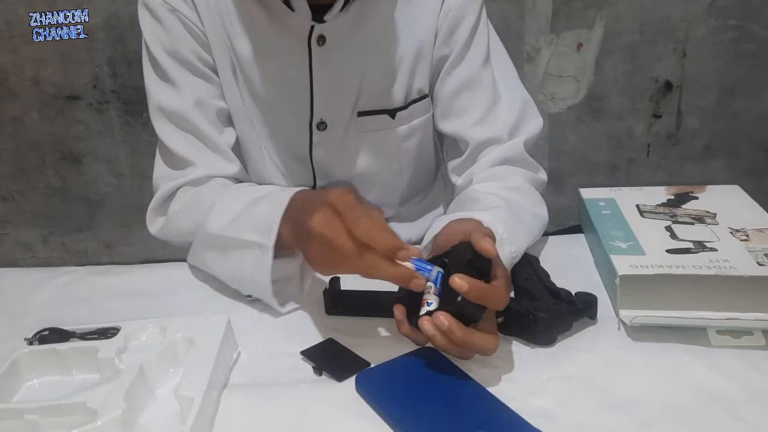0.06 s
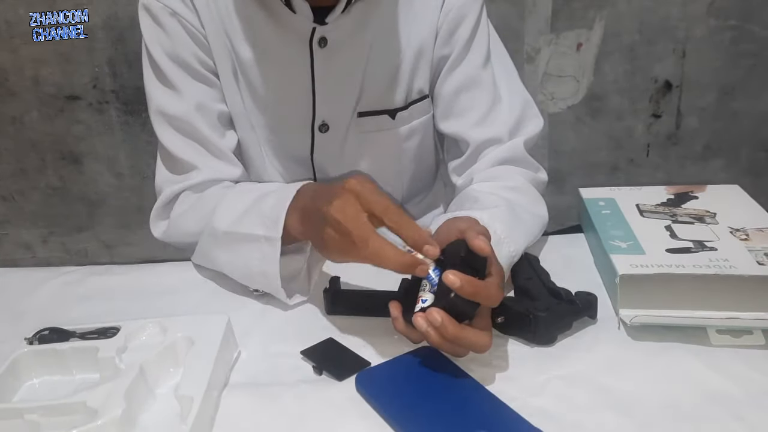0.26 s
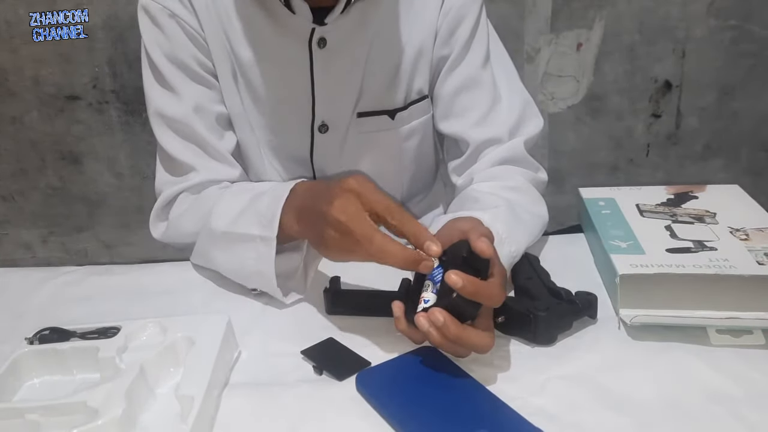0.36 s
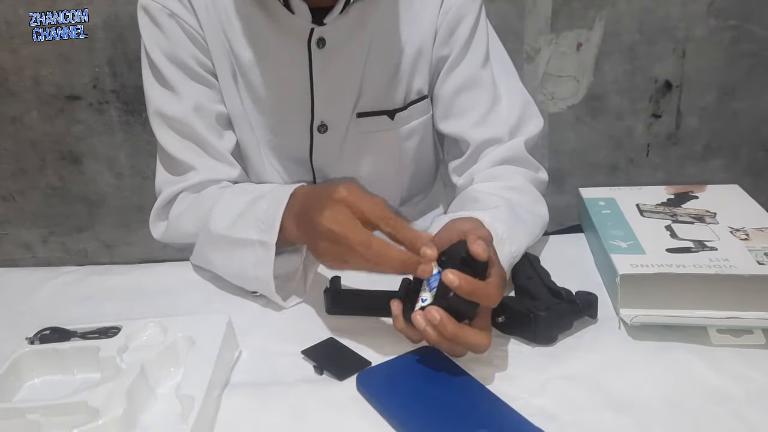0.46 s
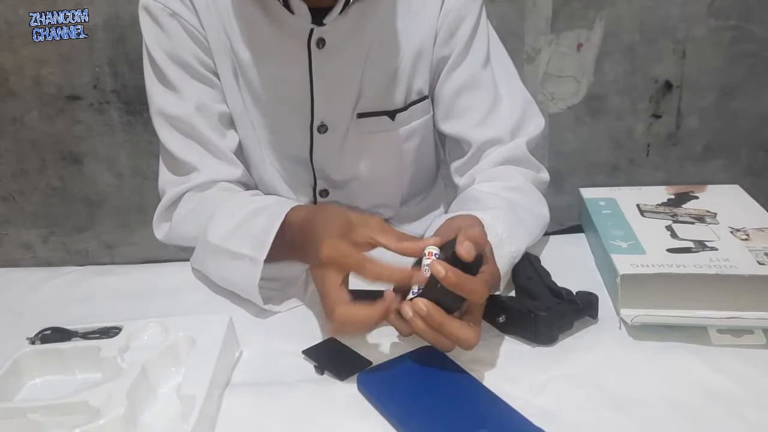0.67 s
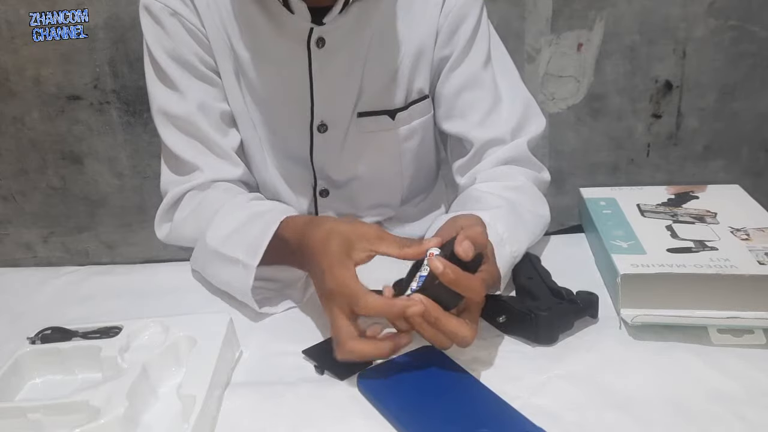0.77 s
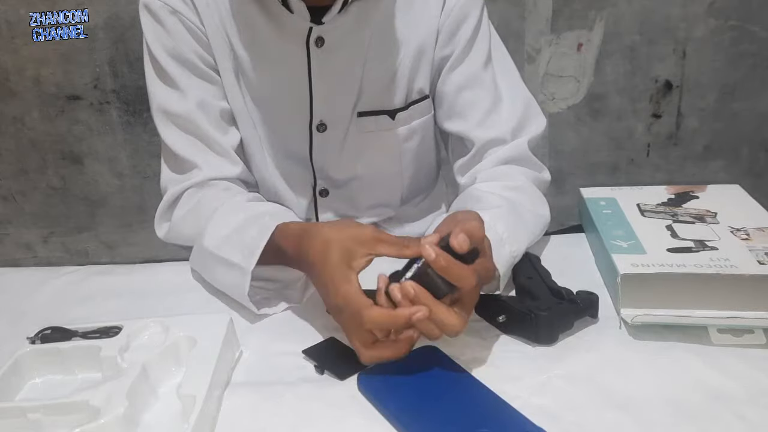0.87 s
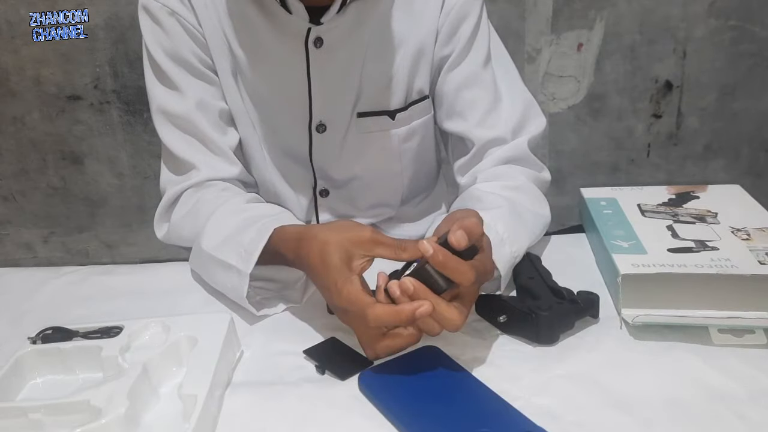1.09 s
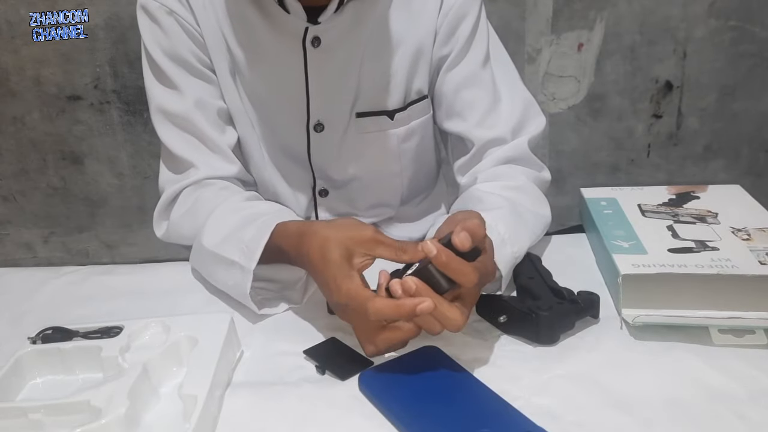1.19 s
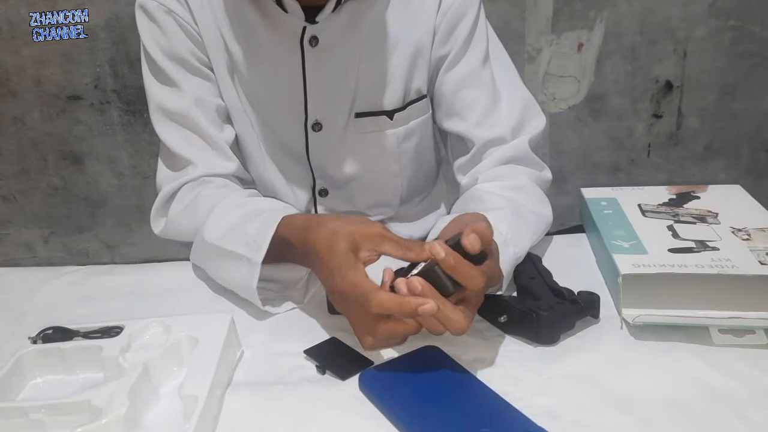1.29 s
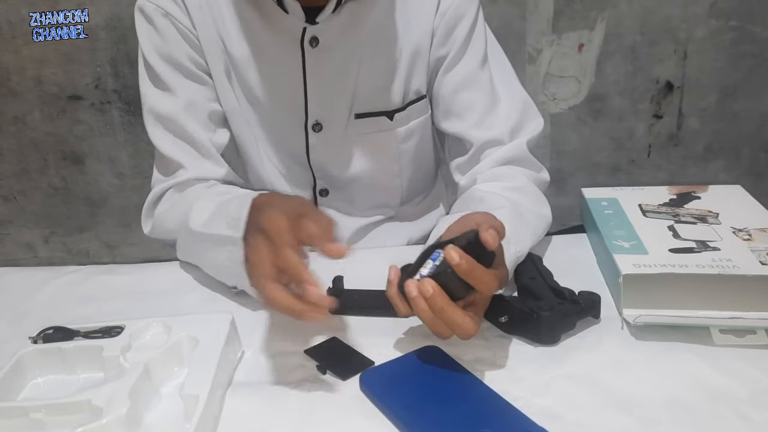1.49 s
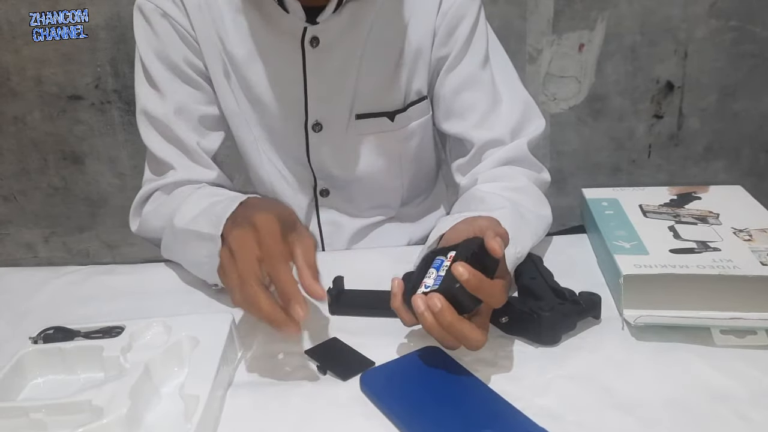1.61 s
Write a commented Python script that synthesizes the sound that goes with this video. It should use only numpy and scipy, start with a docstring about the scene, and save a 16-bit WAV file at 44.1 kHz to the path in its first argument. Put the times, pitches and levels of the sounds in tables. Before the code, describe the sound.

Sharp plastic clicks of a battery being fitted into a small light, over faint crickets.

```python
"""A bare, ringing room, with a cricket and an insect chorus singing outside.
A low room ring dies away into faint rustle; a battery is pushed into a small light's plastic compartment.
It knocks against the housing, scrapes past the spring contact in tiny slips and snaps home.
Nearly all of the sound is in the right channel; the left carries little but hiss."""
import sys
import numpy as np
from scipy import signal
from scipy.fft import rfft, irfft
from scipy.io import wavfile
from scipy.ndimage import uniform_filter1d

SR = 44100
rng = np.random.default_rng(int(sys.argv[2]) if len(sys.argv) > 2 else 0)


def output_pcm(signal):
    """Save a mono or channel-first signal as 16-bit PCM at the path in sys.argv[1].

    Samples are clipped to [-1, 1] before scaling.
    """
    pcm = np.clip(np.atleast_2d(signal).T, -1, 1) * 32767
    wavfile.write(sys.argv[1], SR, np.round(pcm).astype(np.int16))


N = 72765
T = np.arange(N) / SR
RING_T = np.arange(int(.6 * SR)) / SR


def amp(db):
    """Decibels to gain."""
    return 10 ** (np.asarray(db) / 20)


def unit(x):
    """Scales to unit rms."""
    return x / np.sqrt(np.mean(x ** 2) + 1e-20)


def read(points, hz):
    """Table lookup on a log-frequency axis."""
    f, value = np.transpose(points)
    return np.interp(np.log(hz + 1), np.log(f + 1), value)


def add(mix, start_s, sound):
    """Mixes a sound in at start_s."""
    part = mix[max(round(start_s * SR), 0):][:len(sound)]
    part += sound[:len(part)]


def noise(colour, size):
    """Steady coloured noise, unit rms."""
    hz = np.fft.rfftfreq(size, 1 / SR)
    phases = np.exp(2j * np.pi * rng.random(len(hz)))
    return unit(irfft(phases * amp(read(colour, hz)), size))


def ring(modes):
    """Struck modes dying away."""
    return sum(amp(db - 60 * RING_T / t60_s) * np.sin(2 * np.pi * hz * RING_T) for hz, db, t60_s in modes)


# air spectrum: freq_hz, density_db
AIR_COLOUR = [(20, -18.5), (55, 8), (110, 1), (300, -8), (700, -19.5), (1200, -25), (1800, -16),
              (3500, -27.5), (7000, -10.5), (10500, -28), (13000, -23.5), (16000, -25.5)]


def air(level_db=-61):
    """Steady background air."""
    return amp(level_db) * noise(AIR_COLOUR, N)


# hiss spectrum: freq_hz, density_db
HISS_COLOUR = [(20, -12.5), (55, 6), (150, 0), (400, -7.5), (1300, -17), (4000, -23.5), (9000, -32.5),
               (12500, -23), (16000, -24.5)]


def hiss(level_db=-61.5):
    """Microphone self-noise."""
    return amp(level_db) * noise(HISS_COLOUR, N)


# spectrum of opening room ring and rustle: freq_hz, density_db
RING_RUSTLE_COLOUR = [(80, -9), (200, -5.5), (330, 6), (520, -9.5), (750, -3), (1150, -3.5), (1500, -11.5),
                      (4000, -19.5), (9000, -19), (16000, -34)]
# envelope, room ring then rustle: time_s, level_db
RING_RUSTLE_LEVELS = [(0, -47), (.08, -61.5), (.2, -69), (.85, -66.5), (1.25, -61), (1.45, -74),
                      (1.58, -60.5), (1.65, -60)]


def ring_then_rustle():
    """A low room ring dying away at the start, then faint rustle."""
    level_db = np.interp(T, *np.transpose(RING_RUSTLE_LEVELS))
    return amp(level_db) * noise(RING_RUSTLE_COLOUR, N)


def trill(pitch_hz, width_hz):
    """Many wing strokes at one pitch, blurred by distance into a narrow band."""
    hz = np.fft.rfftfreq(N, 1 / SR)
    phases = np.exp(2j * np.pi * rng.random(len(hz)))
    band = (1 + ((hz - pitch_hz) / (.7 * width_hz)) ** 2) ** -1.3
    return unit(irfft(phases * band, N))


# insect bands: pitch_hz, width_hz, level_db
CHORUS_BANDS = [(2530, 300, -69), (5610, 170, -57), (5930, 490, -59.5), (6500, 510, -64), (8200, 740, -59),
                (8710, 390, -61.5)]


def chorus():
    """Distant insects trilling steadily."""
    return sum(amp(db) * trill(hz, width_hz) for hz, width_hz, db in CHORUS_BANDS)


def cricket(first_s=.083, period_s=.283, chirp_s=.18, level_db=-57):
    """One cricket chirping in even time."""
    progress = np.clip(((T - first_s) % period_s) / chirp_s, 0, 1)
    swell = np.sin(np.pi * progress ** .7)
    return amp(level_db) * swell * trill(pitch_hz=4466, width_hz=250)


# housing modes: pitch_hz, level_re_knock_db, t60_s
HOUSING_MODES = [(959, -20.5, 0.16), (1100, -32.5, 0.45), (1138, -22, 0.32), (1538, -40, 0.21),
                 (2119, -31, 0.17), (2566, -39, 0.18)]


def knock(pitch_hz, rise_s=.00081, hold_s=.0059):
    """A short knock that holds a few milliseconds, then drops sharply; the housing rings on."""
    attack = 1 - np.exp(-RING_T / rise_s)
    drop = np.exp(-(RING_T / hold_s) ** 6.8)
    return attack * drop * np.sin(2 * np.pi * pitch_hz * RING_T) + ring(HOUSING_MODES)


def thud(pitch_hz, rise_s=.0012, t60_s=.027, after_db=-21, after_t60_s=.25):
    """A short low tone with a faint after-ring."""
    attack = 1 - np.exp(-RING_T / rise_s)
    return attack * ring([(pitch_hz, 0, t60_s), (pitch_hz, after_db, after_t60_s)])


# spring modes: pitch_hz, level_re_ping_db, t60_s
SPRING_MODES = [(6140, -1.5, 0.019), (6620, -2, 0.0082), (7340, -9.5, 0.0073), (8330, -18.5, 0.017)]


def ping():
    """The spring contact ringing briefly."""
    return ring(SPRING_MODES)


def crack(colour, peak_hz, decay_s, peak_db=10.5, width_oct=.3):
    """A burst of contact noise, lifted at the resonance of the struck spot."""
    t = RING_T[:2048]
    hz = np.fft.rfftfreq(len(t), 1 / SR)
    spectrum = rfft(rng.standard_normal(len(t)) * np.exp(-t / decay_s))
    flat = spectrum / np.sqrt(uniform_filter1d(abs(spectrum) ** 2, size=15))
    lift_db = peak_db * np.exp(-(np.log2((hz + 1) / peak_hz) / width_oct) ** 2)
    shape = unit(amp(read(colour, hz) + lift_db))
    burst = irfft(flat * shape)[:len(t) // 2] * np.sqrt(decay_s * SR / 2)
    return np.pad(burst, (0, len(RING_T) - len(burst)))


# plastic clack spectrum: freq_hz, density_db
CLACK_COLOUR = [(100, -46), (250, -23), (450, -11), (650, -3.5), (1150, 4.5), (1400, -5), (1800, -8.5),
                (2200, -2.5), (2700, -1), (3500, -8), (4600, 1), (6000, -8), (9000, -25), (16000, -42)]
# hard tick spectrum: freq_hz, density_db
TICK_COLOUR = [(150, -54), (500, -29), (2000, -8.5), (4500, 0.5), (5300, -6), (6800, 6.5), (8200, -3),
               (9500, -17), (12000, -1.5), (14000, -12), (16000, -9)]


def blow(knock_db, knock_hz, thud_db, thud_hz, clack_db, clack_hz, tick_db, tick_hz, ping_db, room_db):
    """One contact: the body rings, the surfaces crack, the room answers."""
    body = amp(knock_db) * knock(knock_hz) + amp(thud_db) * thud(thud_hz) + amp(ping_db) * ping()
    low_cut = signal.butter(4, 499, "high", fs=SR, output="sos")  # a small housing radiates little bass
    clack = amp(clack_db) * crack(CLACK_COLOUR, clack_hz, decay_s=.0032)
    tick = amp(tick_db) * crack(TICK_COLOUR, tick_hz, decay_s=.003)
    direct = signal.sosfilt(low_cut, body) + clack + tick
    return direct + amp(room_db) * (room(direct) + echo(direct))


# battery-on-housing contacts: start_s, knock_db, knock_hz, thud_db, thud_hz,
# clack_db, clack_hz, tick_db, tick_hz, ping_db, room_db
BATTERY_BLOWS = [ (.2224, -3, 1068, -22, 777, -15, 2850, -22.5, 6300, -22, -3.5),
                 (.2308, -8, 921, -17, 857, -24, 2700, -39.5, 6540, -45, 0),
                 (.2345, -7, 1136, -35, 930, -23.5, 2860, -46.5, 4500, -55, 1.5),
                 (.2686, -16.5, 1120, -8.5, 678, -23, 2950, -22.5, 11700, -19, -3.5),
                 (.2835, -12, 1130, -14.5, 659, -24.5, 2840, -30, 11700, -37, -10),
                 (.3708, -23, 1084, -30, 790, -23.5, 2170, -23.5, 4430, -39, 2.5),
                 (.3805, -42, 1025, -17, 940, -21, 2150, -37, 5636, -42, -22),
                 (.3994, -18.5, 910, -15.5, 719, -17, 3280, -31.5, 5200, -30, -8),
                 (.5115, -30.5, 1016, -34.5, 739, -34.5, 3120, -43, 5800, -48.5, -10),
                 (.5555, -35.5, 940, -31, 658, -41, 3280, -42.5, 4470, -39.5, 16),
                 (.5636, -18, 994, -19.5, 621, -20.5, 3596, -27, 4520, -35, -8),
                 (.5796, -17, 1070, -21.5, 556, -16, 2638, -28.5, 8150, -44.5, -2.5),
                 (.5842, -12.5, 894, -14.5, 807, -19.5, 3324, -21.5, 7950, -25, -3),
                 (.5876, -15.5, 1040, -18, 572, -18, 3530, -31, 4470, -29, -7.5),
                 (.5987, -14, 1087, -17, 630, -24, 3700, -24.5, 6000, -30.5, -5),
                 (.7430, -16.5, 1097, -20.5, 781, -34.5, 2160, -46.5, 4474, -64, -6.5),
                 (.7927, -38, 1155, -36, 788, -41, 3000, -37, 6980, -47.5, -3.5),
                 (.8808, -56.5, 1030, -62, 770, -60.5, 2960, -45.5, 6570, -54, -13.5),
                 (.8975, -41.5, 1100, -61.5, 694, -70.5, 2500, -62.5, 6500, -66.5, 0.5),
                 (.9744, 3.5, 1063, -14, 735.5, -9.5, 1936, -10.5, 8930, -13.5, -0.5),
                 (1.508, -40, 1087, -48.5, 807, -69, 2450, -52.5, 6500, -65, -0.5),
                 (1.567, -48, 1077, -63, 785, -70, 2520, -65.5, 6500, -70, -14)]


def battery():
    """The battery knocks against the housing and snaps home."""
    out = np.zeros(N)
    for start_s, *contact in BATTERY_BLOWS:
        add(out, start_s, blow(*contact))
    return out


# room modes: pitch_hz, gain_db, t60_s
STANDING_MODES = [(573, 2, .36), (658, 7.5, .38), (828, 3, 0.28), (850, -3, .36), (925, 2, .36),
                  (1076, 2.5, 0.32), (1187, 6, .36)]


def standing_waves():
    """Low room modes ringing on with a clear pitch."""
    mean_t60_s = np.mean(np.transpose(STANDING_MODES)[2])
    return ring(STANDING_MODES) * 2 * np.log(1000) / (mean_t60_s * SR)


# diffuse tail decay: freq_hz, t60_s
TAIL_DECAY = [(300, 0.33), (800, 0.332), (2000, 0.2947), (5500, 0.32), (12000, 0.25)]
# diffuse tail spectrum: freq_hz, relative_db
TAIL_COLOUR = [(200, 1), (400, -14), (700, 9), (1070, -8), (1500, 4), (2800, 7.5), (4500, 4), (7000, -3.5),
               (12000, 0.5), (16000, 1)]


def room(sound, delay_s=.00067, build_s=.0089, diffuse_db=2):
    """Dense reflections off bare walls; a new pattern per contact, as the hands move."""
    size = len(RING_T)
    hz, t, spectra = signal.stft(rng.standard_normal(size), SR, nperseg=512)
    flat = np.sqrt(np.mean(abs(spectra) ** 2)) * spectra / (abs(spectra) + 1e-12)
    t60_s = read(TAIL_DECAY, hz)[:, None]
    decay = amp(read(TAIL_COLOUR, hz)[:, None] - 60 * t / t60_s)
    energy_norm = np.sqrt(2 * np.log(1000) / (t60_s * SR))
    diffuse = signal.istft(flat * decay * energy_norm, SR, nperseg=512)[1][:size]
    tail = amp(diffuse_db) * diffuse + standing_waves()
    build = 1 - np.exp(-np.maximum(RING_T - delay_s, 0) / build_s)
    return signal.fftconvolve(sound, tail * build)[:size]


def echo(sound, delay_s=.069, gain_db=-14, cutoff_hz=2420):
    """One dull return from the far wall."""
    dull = signal.sosfilt(signal.butter(2, cutoff_hz, fs=SR, output="sos"), sound)
    out = np.zeros(len(sound))
    add(out, delay_s, amp(gain_db) * dull)
    return out


# scrape spectrum: freq_hz, density_db
SCRAPE_COLOUR = [(120, -38), (250, -15), (350, 6.5), (450, -1.5), (800, -1), (1200, -12), (1500, -25),
                 (2300, -17), (3000, 0.5), (3400, 5), (4200, -2.5), (5200, -10), (8000, -15.5),
                 (16000, -33)]


def scrape(length_s=.036, slips_per_s=713, slip_decay_s=.003, level_db=-26.5, room_db=-1):
    """Tiny slips as the battery slides down the compartment wall, past the spring."""
    slips = (rng.random(len(RING_T)) < slips_per_s / SR).astype(float)
    grain = unit(signal.fftconvolve(slips, np.exp(-RING_T / slip_decay_s))[:len(slips)])
    stroke = np.sin(np.pi * np.minimum(RING_T / length_s, 1))
    direct = amp(level_db) * stroke * grain * noise(SCRAPE_COLOUR, len(RING_T))
    return direct + amp(room_db) * room(direct)


def scene():
    """Right: the room and the insects. Left: hiss and a faint leak."""
    indoors = ring_then_rustle() + battery()
    add(indoors, start_s=.58, sound=scrape())
    right = indoors + cricket() + chorus() + air()
    left = amp(-42.5) * right + hiss()
    return np.array([left, right])


def record(dry):
    """Gain control dips after the loudest blows; then clipping and a low-pass."""
    threshold_db, duck_share, release_db_per_s, cutoff_hz = -14, .4, 14.5, 15850
    power_db = 10 * np.log10(abs(uniform_filter1d(dry[1] ** 2, size=180)) + 1e-12)
    fall_db = T * release_db_per_s
    held_db = np.maximum.accumulate(power_db + fall_db) - fall_db
    over_db = np.maximum(held_db - threshold_db, 0)
    clipped = np.clip(dry * amp(-duck_share * over_db), -.94, .94)
    low_pass = signal.firwin(401, cutoff_hz, window=("kaiser", 8), fs=SR)
    return signal.oaconvolve(clipped, low_pass[None], "same")


dry = scene()
out = record(dry)
output_pcm(out)
```